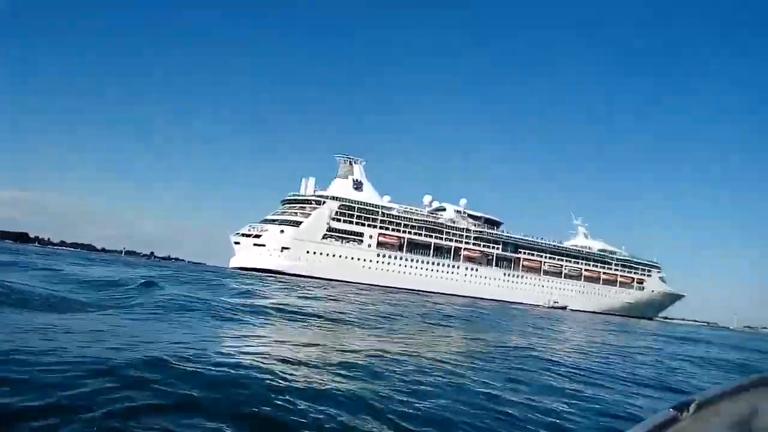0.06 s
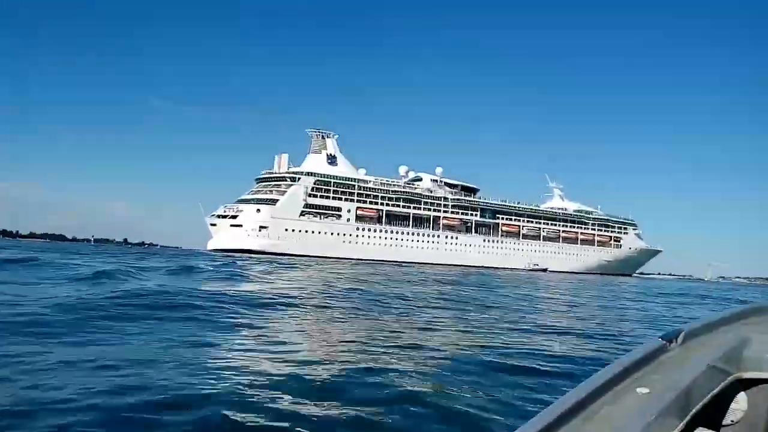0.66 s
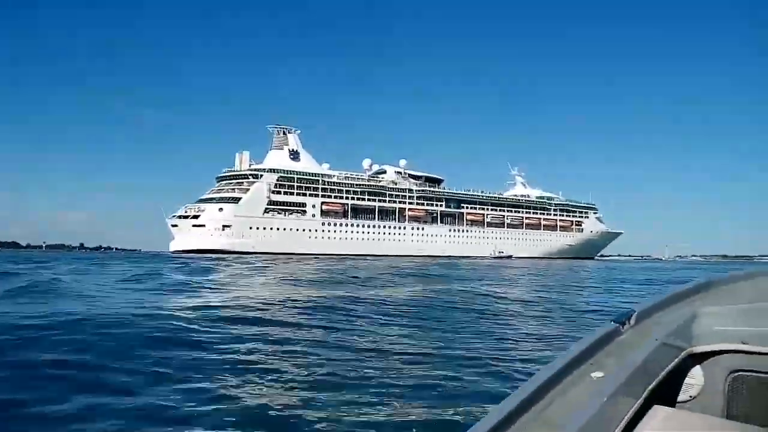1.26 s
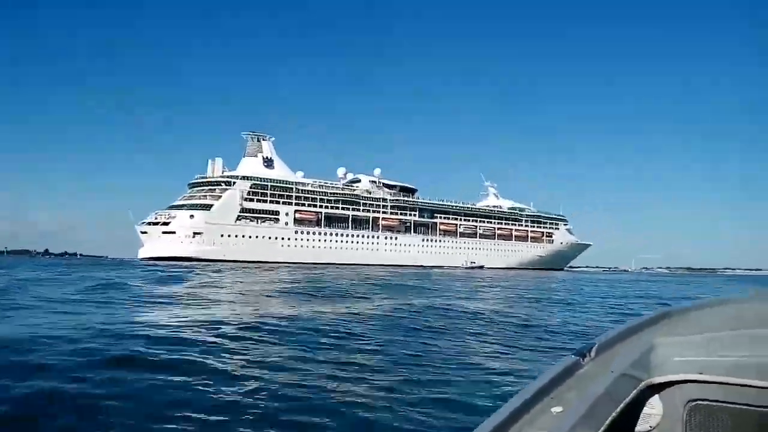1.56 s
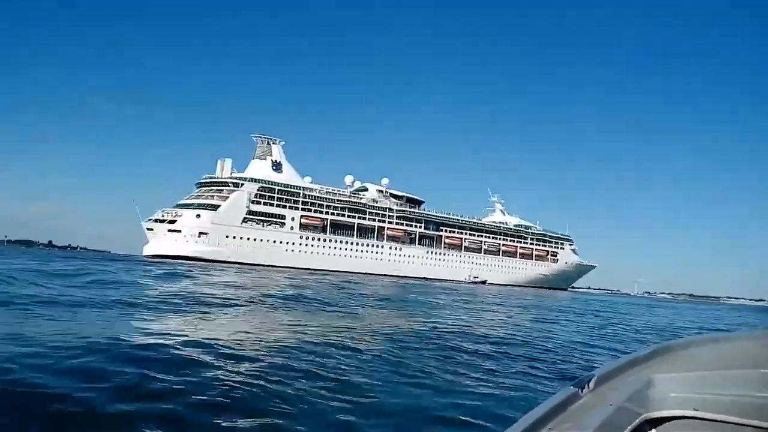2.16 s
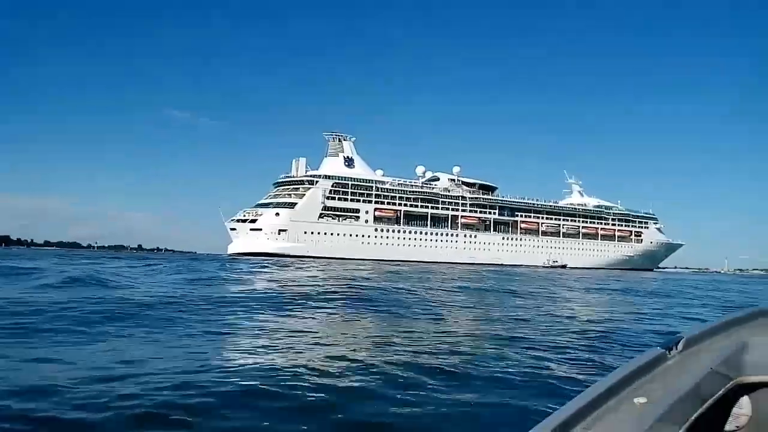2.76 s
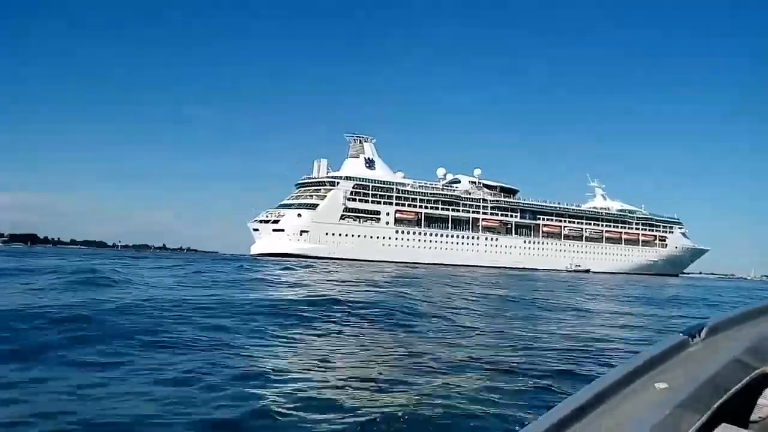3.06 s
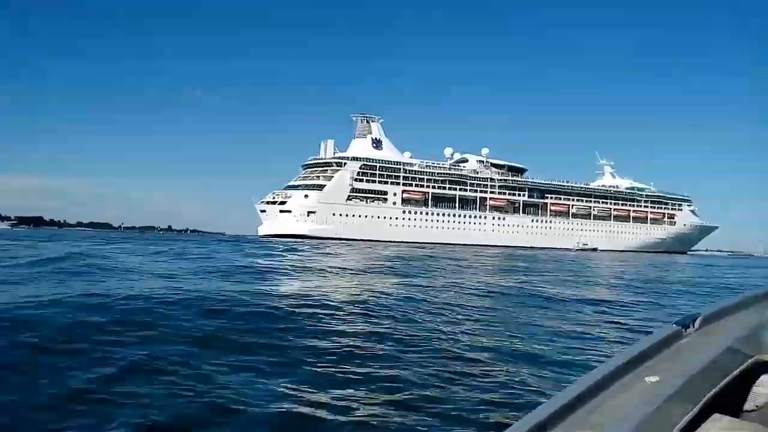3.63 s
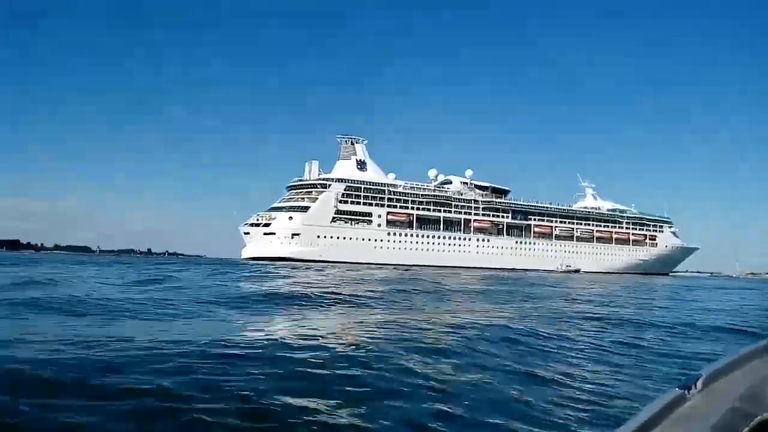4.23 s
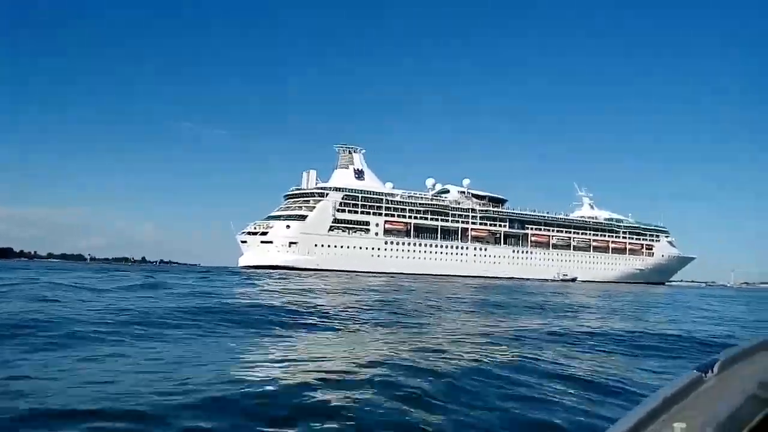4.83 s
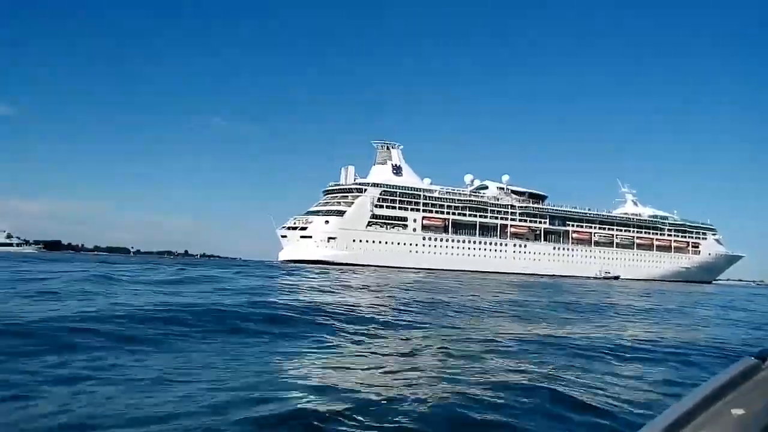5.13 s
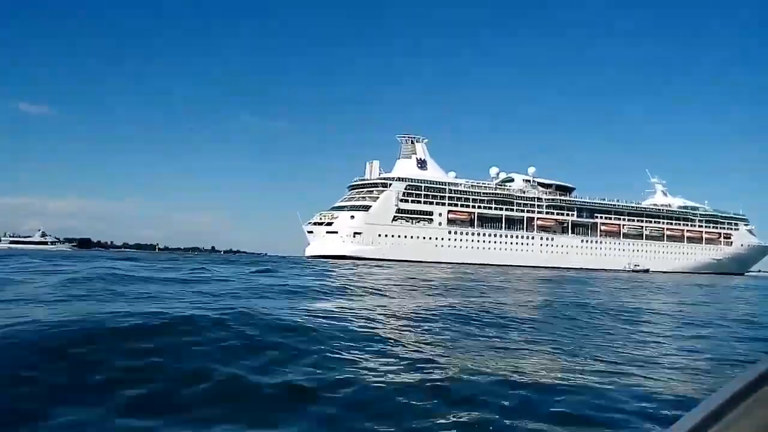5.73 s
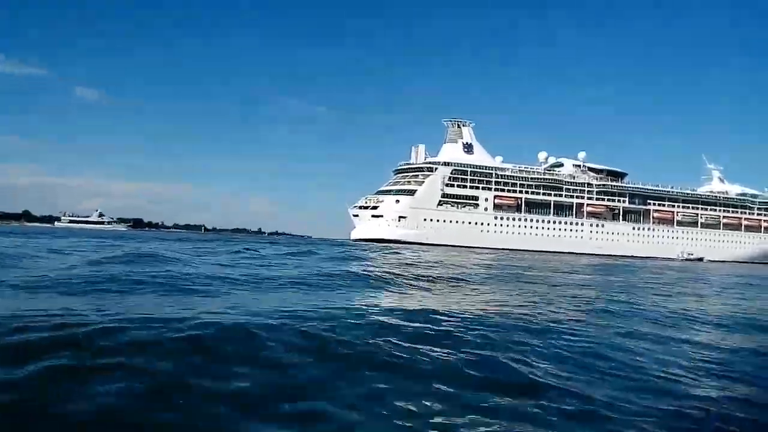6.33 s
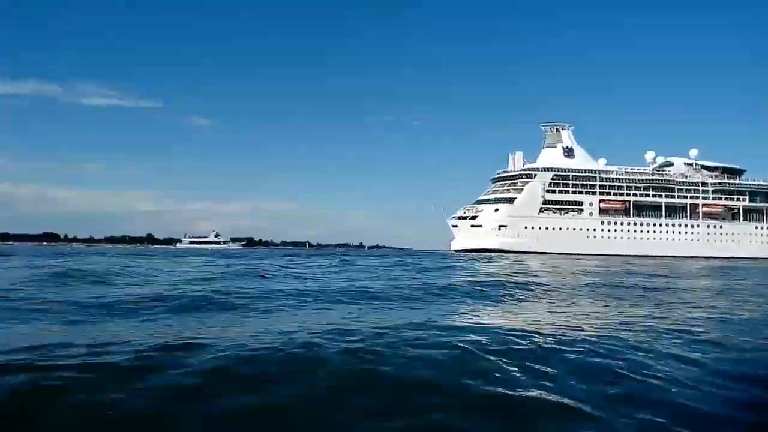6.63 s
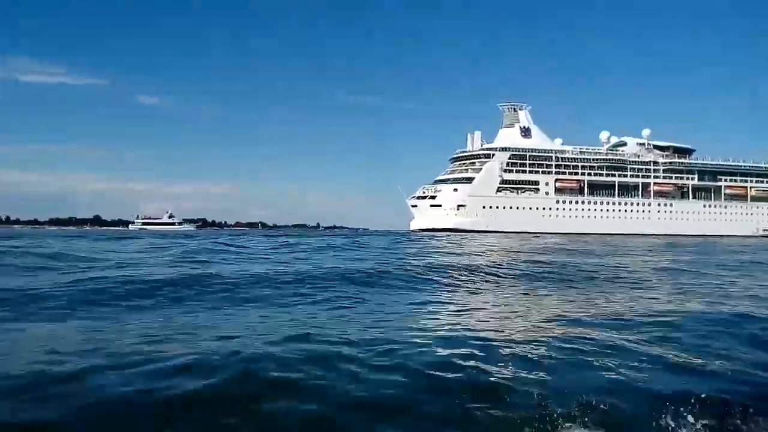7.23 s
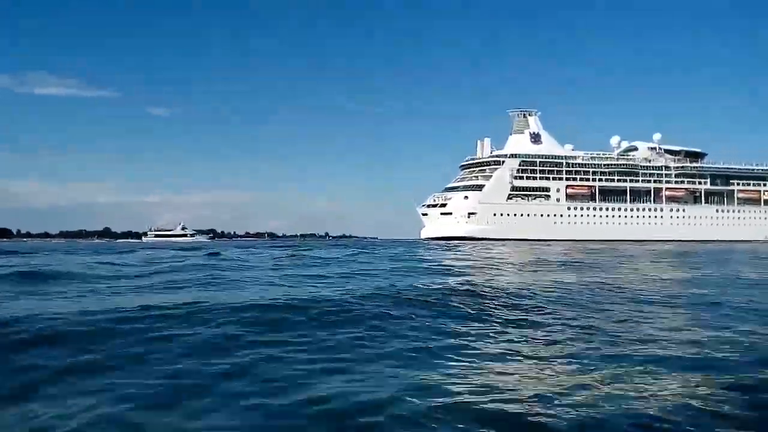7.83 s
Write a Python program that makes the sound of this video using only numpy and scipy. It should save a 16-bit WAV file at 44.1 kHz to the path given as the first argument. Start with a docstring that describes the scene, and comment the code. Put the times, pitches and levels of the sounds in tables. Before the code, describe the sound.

From the very start, a large ship holds a loud, deep horn chord of two tones, with a fast flutter and a slight rasp. It cuts off at about 2.4 seconds, leaving a brief echo off the water. Close by, a small motorboat engine drones evenly with a low throb for all eight seconds. Water washes and fizzes along the hull throughout, with small splashes in the first half second and around 2 seconds. Fine spray swells near 0.7, 3.3 and 7.2 seconds. Wind buffets the microphone with hollow low thumps, hardest at the start, then around 1.5, 2, 4.1 to 4.5, 6.3 and 8 seconds, while the underlying breeze eases. Very faint high ticks from a lens motor and a tiny wind whistle come near 1 second. The wind and hiss sit mostly on the left; the right side is muffled.

```python
"""On a lagoon, aboard a small cruising motorboat. A large ship holds a deep two-tone horn chord
until its valve shuts at about 2.4 s. Close by, the engine drones evenly with each firing, and the
wash hisses along the hull and throws fine spray. Gusts thump the open left microphone port;
the right port is covered and muffled. A lens motor ticks faintly near the one-second mark."""
import sys
import numpy as np
from scipy.fft import rfft, irfft, next_fast_len
from scipy.io import wavfile
from scipy.ndimage import map_coordinates

SR = 44100
rng = np.random.default_rng(int(sys.argv[2]) if len(sys.argv) > 2 else 0)


def digitize_waveform(pressure):
    """Quantize a signal to 16-bit integers and store it at the path in sys.argv[1].

    Rows of a 2-D input are taken as channels; values are limited to [-1, 1].
    """
    field = np.atleast_2d(pressure).T
    bounded = np.clip(field, -1, 1)
    quanta = np.round(bounded * 32767).astype(np.int16)
    wavfile.write(sys.argv[1], SR, quanta)


N = 356769


def horn():
    """The ship's two horns, a minor third apart, beat 13 times a second; the lower rasps once a cycle."""
    # Partials of each horn. Each row: harmonic number, level in dB.
    low_partials = [(1, -17), (2, -20.5), (3, -29.5), (4, -34.5), (5, -36), (6, -41.5), (7, -44), (8, -58),
                    (9, -52), (10, -60), (11, -54), (14, -65), (17, -51.5), (19, -63), (21, -58), (24, -67),
                    (32, -66)]
    high_partials = [(1, -14.5), (2, -16), (3, -42), (4, -54.5), (5, -62.5), (6, -51.5), (7, -55.5),
                     (8, -60), (12, -66), (15, -66), (22, -75.5)]
    # The rasp's spectrum. Each row: frequency in Hz, level in dB.
    rasp_spectrum = [(300, -11), (700, -7), (1050, -21.5), (1300, 4), (1600, -0.5), (2000, -3.5),
                     (3000, -6.5), (4000, -8), (6000, -17.5), (12000, -39)]
    low_hz, high_hz = 74.27, 87.36
    t = clock() - .01  # the beat first peaks at 10 ms
    low, high = [2 * np.pi * hz * t + .06 * wobble(2) for hz in (low_hz, high_hz)]
    chord = partials(low, low_partials, waver=.018, rate=4, count=32)
    chord += partials(high, high_partials, waver=.018, rate=4, count=22)
    rasp = amp(-42) * bursts(low, sharpness=.41) * rush(rasp_spectrum)
    fundamentals = lowpass(chord, 115, slope=16)
    # as the air pressure falls, the overtones give out before the fundamentals
    return blast(early_s=0) * fundamentals + blast(early_s=.032) * (chord - fundamentals + rasp)


def blast(early_s):
    """The horns' gain: it holds until early_s before the valve shuts, then drops to an echo off the water."""
    valve_shuts_s, release_s = 2.433, .069
    echo_db, echo_hold_s, fade_db_per_s = -18.5, .15, 108.5
    since = np.maximum(clock() - valve_shuts_s + early_s, 0)
    echo = amp(echo_db - fade_db_per_s * np.maximum(since - echo_hold_s, 0))
    return np.maximum(np.exp(-(since / release_s) ** 2), echo)


def engine():
    """The boat's firings make a hum, exhaust overtones and a rumble; uneven cylinders add a slow throb."""
    # Engine speed. Each row: time in seconds, firing rate in Hz.
    speed = [(0, 63.6), (.45, 62.6), (1.5, 62.65), (2.1, 63.1), (4.4, 62.8), (5.0, 62.55), (6.0, 62.8),
             (7.0, 62.5), (7.55, 62.0), (8.09, 62.4)]
    # Exhaust tones. Each row: multiple of the firing rate, level in dB.
    exhaust = [(1, -23.6), (2, -30.6), (3, -36.3), (4, -52), (5, -49), (6, -52), (8, -56)]
    # Exhaust colour. Each row: time in seconds, dB added to the second tone and taken off the higher ones.
    exhaust_tilt = [(2.4, 1), (2.8, -3.5), (3.3, 3), (3.9, -1), (4.3, 6.5), (4.7, -2), (5.1, -1), (5.7, 0),
                    (6.0, 2.5), (6.6, 1.5), (7.3, -4), (7.55, 0), (8.09, 3.5)]
    # The rumble's spectrum. Each row: frequency in Hz, level in dB.
    rumble_spectrum = [(10, -19.5), (28, -9.5), (42, -10), (55, -2.5), (85, -1), (112, -2.5), (190, 1.5),
                       (260, -10), (400, -17.5), (700, -26), (1500, -25.5), (4000, -55.5)]
    cruise_hz, hum_db_per_hz = 62.7, 1
    firing_hz, = curves(speed)
    tilt_db, = curves(exhaust_tilt)
    phase = 2 * np.pi * np.cumsum(firing_hz) / SR
    drone = partials(phase, exhaust, waver=.12, rate=6, count=8)
    hum = lowpass(drone, 95, slope=12)
    upper = drone - lowpass(drone, 156, slope=20)
    second = drone - hum - upper
    overtones = amp(-.34) * unit(amp(.58 * wobble(5))) * (amp(tilt_db) * second + amp(-tilt_db) * upper)
    rumble = amp(-28.5) * bursts(phase, sharpness=.076) * rush(rumble_spectrum)
    throb = np.cos(phase / 5)
    hum *= amp(hum_db_per_hz * (firing_hz - cruise_hz) + .25 * wobble(9))
    # the overtones and rumble swell as the boat rides the waves
    bark = amp(-1.12 + .57 * wobble(4)) * (overtones + rumble)
    propeller = amp(-41) * np.sqrt(2) * np.sin(4 / 3 * phase)
    return (hum + bark) * (1 + .02 * throb) + amp(-34.5) * throb + propeller


def wind():
    """Lumpy turbulence right at the microphone, brighter in gusts, with eddies and whistles on top."""
    # Gusts over the breeze. Each row: peak time in seconds, level in dB, half length in seconds.
    gusts = [(.062, -11, 0.033), (.24, -25, 0.25), (.41, -18.5, 0.029), (.585, -20.5, 0.029),
             (1.46, -21, 0.13), (1.96, -21.5, 0.11), (3.1, -30.5, 0.49), (3.61, -27.5, 0.033),
             (3.87, -29.5, 0.044), (4.1, -19.5, 0.03), (4.41, -22.5, 0.08), (5.65, -26, 0.035),
             (6.35, -25, 0.097), (7.96, -27.5, 0.034)]
    # The buffeting's spectrum. Each row: frequency in Hz, level in dB.
    buffet = [(15, -20), (50, -5), (100, 0), (200, -3), (320, -10), (550, -20), (900, -29), (1500, -40),
              (4000, -70)]
    flutter_spectrum = [(150, -20), (300, 0), (550, -3), (900, -8), (1600, -22), (4000, -55)]
    breeze = amp(-25.5 - 2.5 * clock())  # eases steadily
    gust_db = 20 * np.log10(np.hypot(breeze, swells(gusts)))
    lumps = unit(amp(1.8 * wobble(70)))
    rumble = amp(gust_db + 1.5) * rush(buffet)[0]
    flutter = amp(1.15 * gust_db - 14) * rush(flutter_spectrum)[0]
    return lumps * (rumble + flutter) + eddies() + whistles()


def eddies():
    """Each hard eddy sucks at the port, then pushes, amid a tumbling wake; the recess rings hollow."""
    # Single knocks. Each row: time in seconds, level in dB, swirl pitch in Hz, ring pitch in Hz.
    knocks = [(0.045, -15.5, 420, 610), (0.053, -7, 168, 400), (.055, -12.5, 603, 1200),
              (.063, -14.5, 446, 600), (0.072, -21, 520, 950), (.095, -8, 400, 760),
              (.108, -21.5, 498, 620), (.119, -13.5, 480, 760), (0.142, -5.5, 327, 696),
              (0.156, -13.5, 393, 560), (0.427, -11.5, 240, 713), (1.431, -11.5, 300, 587),
              (1.494, -8.5, 219, 496), (1.947, -13, 352, 677), (2.168, -13, 470, 810),
              (3.464, -13.5, 272, 360), (3.863, -14, 246, 430), (4.094, -21, 500, 850),
              (4.115, -6.5, 396, 860), (4.352, -16.5, 260, 720), (4.381, -11.5, 260, 850),
              (4.41, -14, 600, 706), (4.413, -6, 149, 500), (4.427, -7.5, 128, 780), (4.472, -12, 149, 400),
              (4.487, -5, 257, 1400), (5.647, -15, 220, 600), (6.313, -12.5, 257, 800),
              (6.321, -5.5, 115, 330), (6.326, -14, 550, 740), (6.347, -17.5, 600, 790),
              (6.388, -10, 280, 740), (6.398, -8.5, 150, 299), (7.973, -9.5, 110, 382)]
    linger_radians, wake_db, wake_half_s = 4.3, -7, .0048
    ring_width = .59  # share of the ring's pitch
    out = np.zeros(N + SR)
    t = np.arange(-SR // 36, SR // 36) / SR
    bin_hz = np.fft.rfftfreq(len(t), 1 / SR)
    for s, db, hz, ring_hz in knocks:
        angle = 2 * np.pi * hz * t
        swirl = np.tanh(2 * angle) * np.cos(angle / 2) * np.exp(-np.abs(angle) / linger_radians)
        wake = rng.standard_normal(len(t)) * np.exp(-(t / wake_half_s) ** 2)
        tumble = 1 + amp(wake_db) * rfft(np.fft.ifftshift(wake)) / np.linalg.norm(wake)
        ratio = bin_hz / ring_hz
        hollow = 1 / (1 - ratio ** 2 + 1j * ratio * ring_width)
        muffle = 1 / np.sqrt(1 + (ratio / 1.5) ** 8)
        knock = irfft(rfft(swirl) * tumble * hollow * muffle, len(t))
        start = round((s + t[0]) * SR)
        out[start:start + len(t)] += amp(db) * knock
    return out[:N]


def water():
    """Churn along the hull drives the wash and its fizzing foam; some waves throw spray off the bow."""
    # How hard the water churns. Each row: time in seconds, level in dB.
    churn = [(0, 2.5), (.7, 2.5), (1.1, 0.5), (1.7, -1.5), (2.35, 3), (2.75, 2.5), (3.1, 2.5), (3.75, 0.5),
             (4.4, 1.5), (4.75, 2.5), (5.6, 3), (6.15, 1), (6.4, 1.5), (6.8, 0), (7.33, 1.5), (7.5, -0.5),
             (7.85, -2.5), (8.09, 1)]
    # Spectra of the wash, the foam and the hiss alongside. Each row: frequency in Hz, level in dB.
    wash_spectrum = [(100, -7.5), (300, 4.5), (550, 2.5), (1000, -1.5), (1400, -7), (2000, -8), (3200, -13),
                     (6000, -27.5), (15000, -43)]
    foam_spectrum = [(600, -11.5), (1800, -2.5), (3200, -2.5), (4500, -0.5), (7000, -0.5), (15000, 1)]
    side_spectrum = [(1000, -15), (2400, -4), (3800, 0), (5000, -3), (7000, -10), (12000, -30)]
    # Bow spray, and water rushing past on the right.
    # Each row: peak time in seconds, level in dB, half length in seconds.
    sprays = [(.1, -46, 0.18), (.65, -40.5, 0.34), (2.3, -45, .25), (3.05, -45.5, 0.1),
              (3.35, -39.5, 0.081), (4.8, -45.5, 0.18), (7.24, -37, 0.27)]
    side_wash = [(.1, -41, .2), (1.6, -35.5, 0.57), (4.78, -44, .15), (7.17, -44.5, 0.2)]
    churn_db, = curves(churn)
    wash = amp(-37.5 + .18 * churn_db + .87 * wobble(14)) * rush(wash_spectrum)
    foam = amp(-37 + churn_db + .81 * wobble(18)) * rush(foam_spectrum)
    drops = np.array([droplets(2000, spread_db=5.5, hz=9000, cycles=2) for side in range(2)])
    mist = drops - lowpass(drops, 7500, slope=8)
    spray = (amp(-56) + swells(sprays)) * mist  # a thin mist stays between waves
    alongside = swells(side_wash) * rush(side_spectrum) * [[0], [1]]
    return wash + foam + alongside + spray


def droplets(per_second, spread_db, hz, cycles):
    """Tiny bursting bubbles: damped sines of random size, within an octave of hz, at rms 1."""
    when, tuning, rarity = np.hsplit(rng.random((int(per_second * N / SR), 3)), 3)
    t = np.arange(int(10 * cycles / hz * SR)) / SR
    pitch = hz * 2 ** (2 * tuning - 1)
    size = amp(-spread_db * np.log(np.maximum(rarity, .004)))
    rings = size * np.sin(2 * np.pi * pitch * t) * np.exp(-pitch * t / cycles)
    at = (when * N).astype(int) + np.arange(len(t))
    return unit(np.bincount(at.ravel(), rings.ravel(), N)[:N])


def splashes():
    """Wavelets break as short clouds of like-sized bubbles, each cloud a narrow band of noise."""
    # Each row: peak time in seconds, level in dB, pitch in Hz, half length in seconds.
    wavelets = [(0.06, -37.5, 1700, 0.0072), (0.202, -35, 1510, 0.012), (0.257, -29.5, 800, 0.006),
                (0.358, -31.5, 810, 0.007), (0.63, -42.5, 6400, 0.043), (1.914, -32, 713, 0.011),
                (2.333, -41, 1530, 0.04), (2.42, -42, 2080, 0.051)]
    out = np.zeros((2, N))
    for s, db, hz, half_s in wavelets:
        cloud = rush([(hz / 2, -40), (hz * .85, -8), (hz, 0), (hz * 1.15, -8), (hz * 2, -40)])
        out += amp(db) * np.exp(-((clock() - s) / half_s) ** 2) * cloud
    return out


def whistles():
    """A puff of wind sings across an edge: a thin, unsteady tone that rises and falls with the puff."""
    # Each row: peak time in seconds, level in dB, top pitch in Hz, half length in seconds.
    puffs = [(0.915, -38.5, 1563, 0.048), (7.97, -37.5, 1128, .024)]
    sag_octaves = .17
    out = np.zeros(N)
    for s, db, top_hz, half_s in puffs:
        from_peak = np.clip((clock() - s) / half_s, -2, 2)
        hz = top_hz * 2 ** (-sag_octaves * from_peak ** 2) * (1 + .04 * wobble(200))
        tone = np.sqrt(2) * np.sin(2 * np.pi * np.cumsum(hz) / SR)
        out += amp(db + 2.4 * wobble(90)) * np.exp(-from_peak ** 4) * tone
    return out


def focus_ticks():
    """The lens motor steps with tiny high pings that reach the microphones through the camera body."""
    # Each row: time in seconds, peak level on the left in dB.
    steps = [(.838, -57), (.918, -52), (.998, -50.5), (1.078, -53), (1.158, -58), (1.298, -56)]
    ping_hz, half_s, right_db = 12000, .0006, -2
    ticks = swells([(s, db, half_s) for s, db in steps]) * np.sin(2 * np.pi * ping_hz * clock())
    return ticks * amp([[0], [right_db]])


def amp(db):
    """Decibels to gain."""
    return 10 ** (np.asarray(db) / 20)


def unit(x):
    """Scale to rms 1."""
    return x / np.sqrt(np.mean(x ** 2) + 1e-20)


def along(points, hz):
    """Read (Hz, value) points on a log axis."""
    f, v = np.transpose(points)
    return np.interp(np.log(hz + 1e-6), np.log(f), v)


def clock():
    """The time of every sample in seconds."""
    return np.arange(N) / SR


def curves(rows):
    """One value per sample for each column after the time."""
    s, *cols = np.transpose(rows)
    return [np.interp(clock(), s, c) for c in cols]


def wobble(rate):
    """A smooth random curve with rate knots a second."""
    coarse = np.linspace(0, N / SR, num=2048)
    knots = rng.standard_normal(size=1024)
    return np.interp(clock(), coarse, map_coordinates(knots, [coarse * rate], mode="wrap"))


def swells(rows):
    """The gain of bell-shaped swells, summed in power, from (time s, dB, half length s) rows."""
    t = clock()
    return np.sqrt(sum(amp(db) ** 2 * np.exp(-2 * ((t - s) / half_s) ** 2) for s, db, half_s in rows))


def bursts(phase, sharpness):
    """A gain of rms 1 that swells once a cycle."""
    return unit(np.exp(sharpness * np.cos(phase)))


def filtered(x, response):
    """Filter x by a response given as a function of Hz."""
    size = next_fast_len(N + SR // 4)
    return irfft(rfft(x, size) * response(np.fft.rfftfreq(size, 1 / SR)), size)[..., :N]


def lowpass(x, corner_hz, slope):
    """Keep the lows; far above the corner the gain falls 6 dB an octave per unit of slope."""
    return filtered(x, lambda hz: 1 / (1 + (hz / corner_hz) ** slope))


def rush(spectrum):
    """Stereo noise of rms 1 from (Hz, dB) points, partly alike in the lows and unrelated in the treble."""
    # Likeness of left and right. Each row: frequency in Hz, correlation from 0 to 1.
    likeness = [(60, 0.3), (250, 0.54), (500, 0.56), (1000, 0.69), (2000, 0), (4000, 0)]

    def mid_and_side(hz):
        turn = np.arccos(along(likeness, hz)) / 2
        return amp(along(spectrum, hz)) * [np.cos(turn), np.sin(turn)]

    mid, side = filtered(rng.standard_normal((2, N)), mid_and_side)
    return unit(np.array([mid + side, mid - side]))


def partials(phase, levels, waver, rate, count):
    """A harmonic stack whose upper partials waver more in strength and phase."""
    out = np.zeros(N)
    for k in range(1, count + 1):
        depth = min(waver * k, .5)
        strength = amp(along(levels, k)) * (1 + depth * wobble(rate))
        out += strength * np.sin(k * phase + depth * wobble(rate))
    return np.sqrt(2) * out


def arriving(x, left_lag_s):
    """The sound reaches the left port left_lag_s after the right one."""
    return filtered(x, lambda hz: np.exp(1j * np.pi * hz * left_lag_s * np.array([[-1], [1]])))


def scene():
    """Ship to the left, engine to the right, water all round; the wind strikes mainly the left port."""
    ship = arriving(horn(), left_lag_s=-.00022)
    boat = arriving(engine(), left_lag_s=.00023)
    return ship + boat + water() + splashes() + wind() * amp([[0], [-22]])


def record(dry):
    """Loud bass bends and rounds off in the microphones; each port adds its colour; the lens ticks."""
    # The open port rings near 6.5 kHz, the covered one is dull. Each row: frequency in Hz, gain in dB.
    open_port = [(3500, 0), (5000, 2.5), (5900, 6.5), (6550, 11), (7100, 5), (7900, -10), (8700, -16),
                 (11000, -24), (15000, -30)]
    covered_port = [(60, -1.5), (90, -1.8), (170, -3), (300, -4.2), (520, -8), (1000, -11.5), (2000, -15.5),
                    (3000, -22), (4100, -23), (5200, -28.5), (8000, -45), (15000, -46)]
    # The cover also delays the bass. Each row: frequency in Hz, phase lag in radians.
    cover_lag = [(30, .2), (62, .38), (90, .4), (170, .62), (370, .7), (600, .5), (1000, 0)]
    fade_s, ceiling, top_hz = .006, .85, 15400
    dry = dry * np.minimum(np.minimum(clock(), clock()[::-1]) / fade_s, 1)
    # squaring the bass makes sum and difference tones, strongest around 25 Hz
    bass = lowpass(dry, 240, slope=8)
    bend_spectrum = [(8, -20), (13, -5), (23, 10), (28, 10), (45, 0)]
    bent = dry - .32 * filtered(bass ** 2, lambda hz: amp(along(bend_spectrum, hz)))
    excess = bent - bent / (1 + (bent / ceiling) ** 8) ** (1 / 8)
    left, right = bent - lowpass(excess, 900, slope=4)
    left = filtered(left, lambda hz: amp(along(open_port, hz)))
    right = filtered(right, lambda hz: amp(along(covered_port, hz)) * np.exp(-1j * along(cover_lag, hz)))
    return filtered(np.array([left, right]) + focus_ticks(), lambda hz: hz < top_hz)


dry = scene()
out = record(dry)
digitize_waveform(out)
```